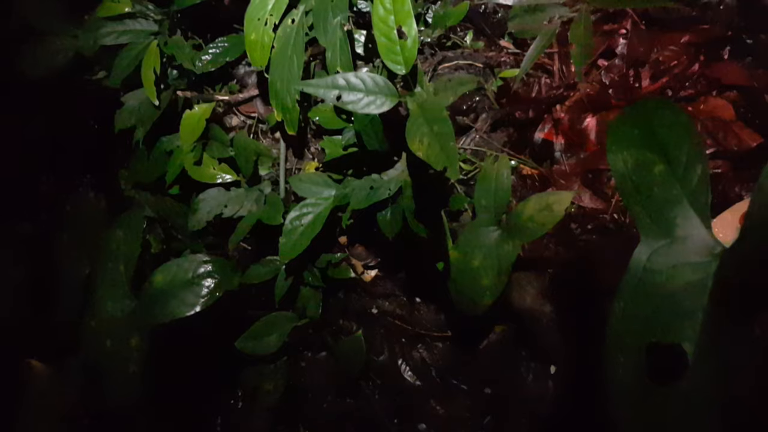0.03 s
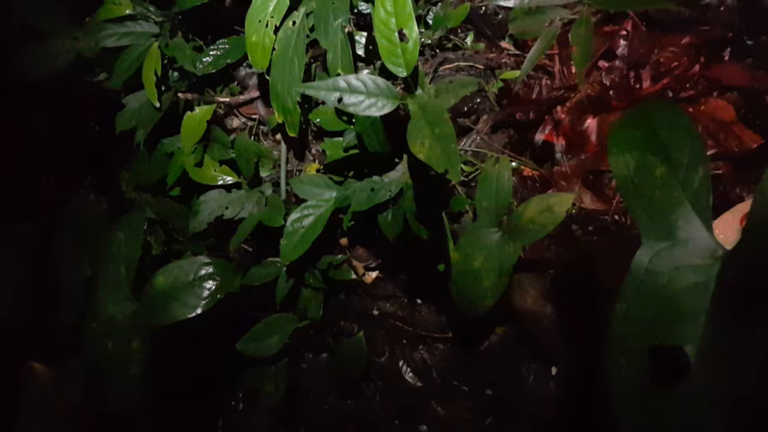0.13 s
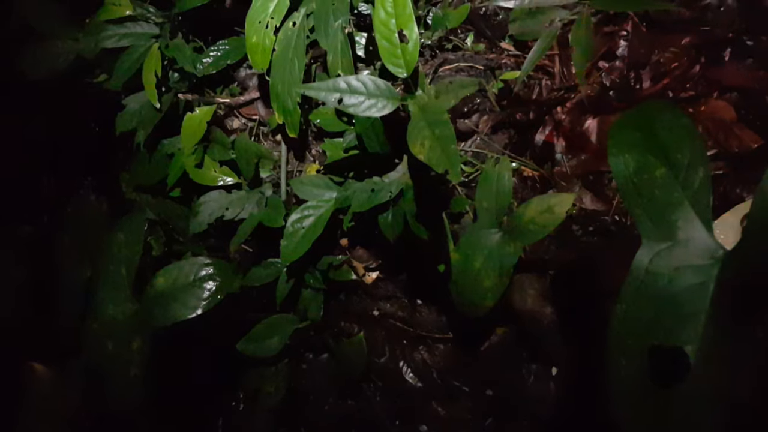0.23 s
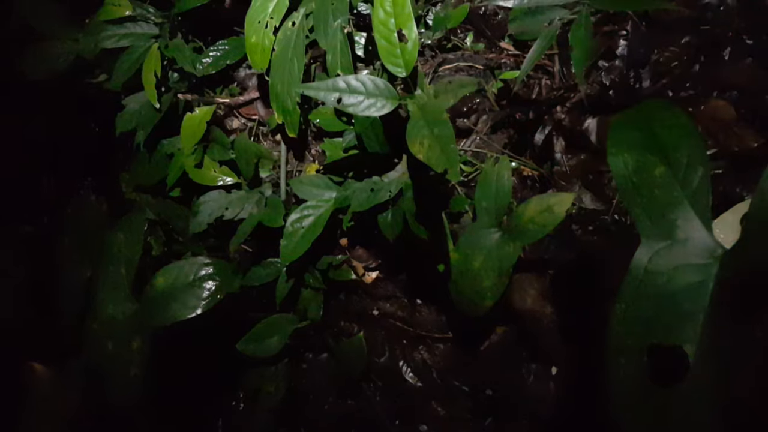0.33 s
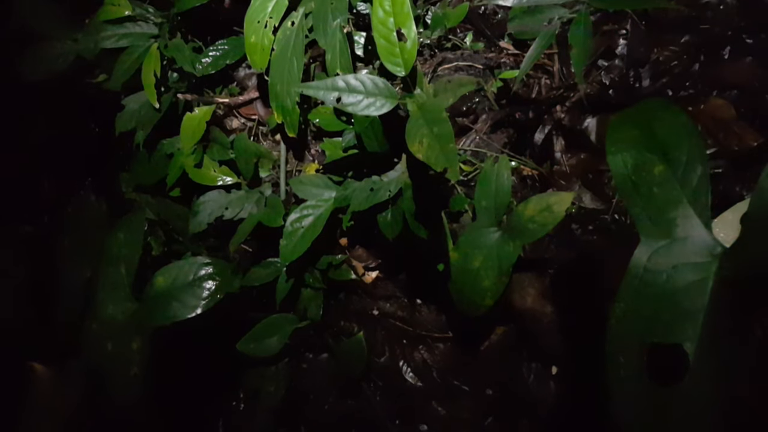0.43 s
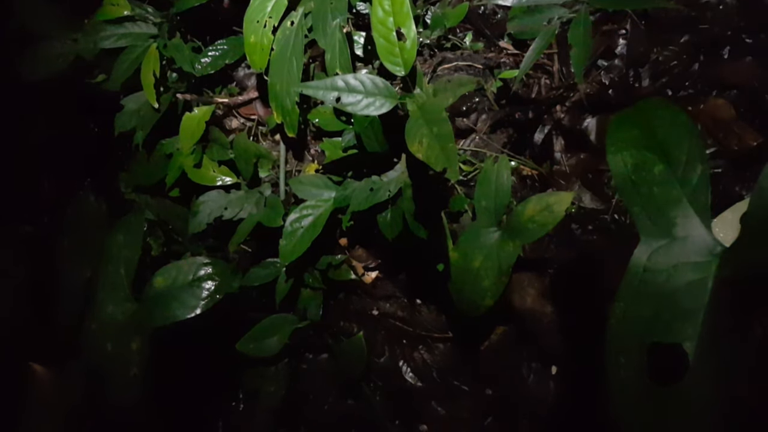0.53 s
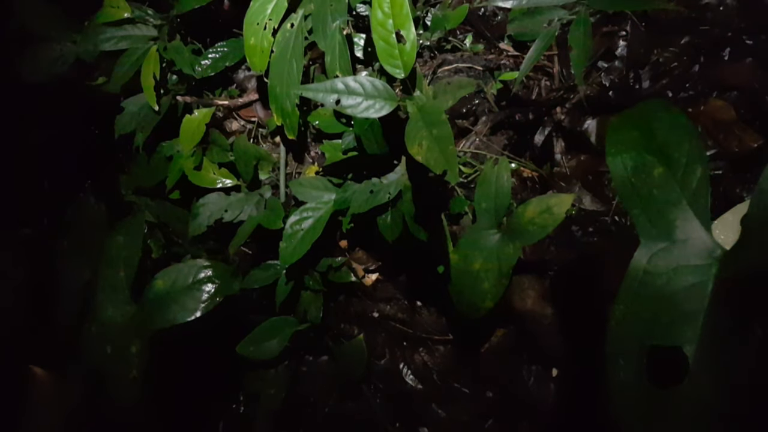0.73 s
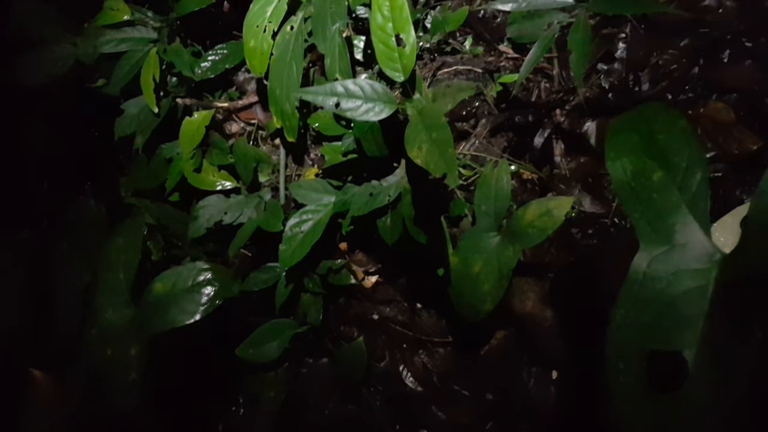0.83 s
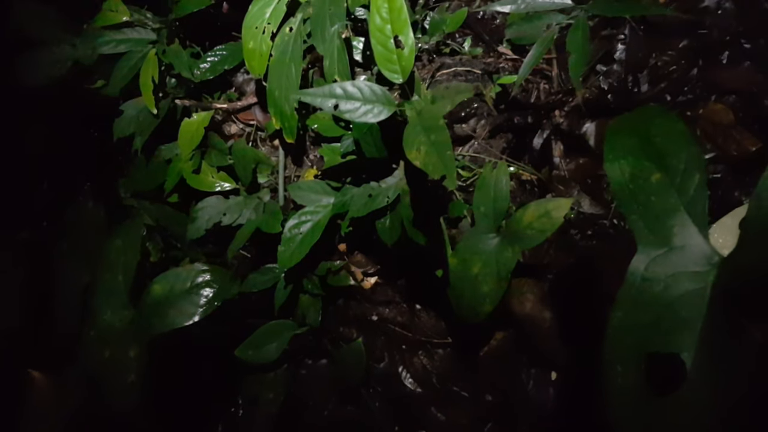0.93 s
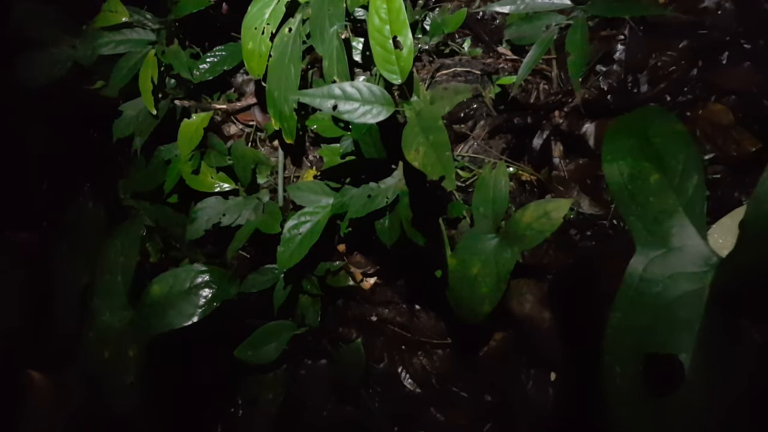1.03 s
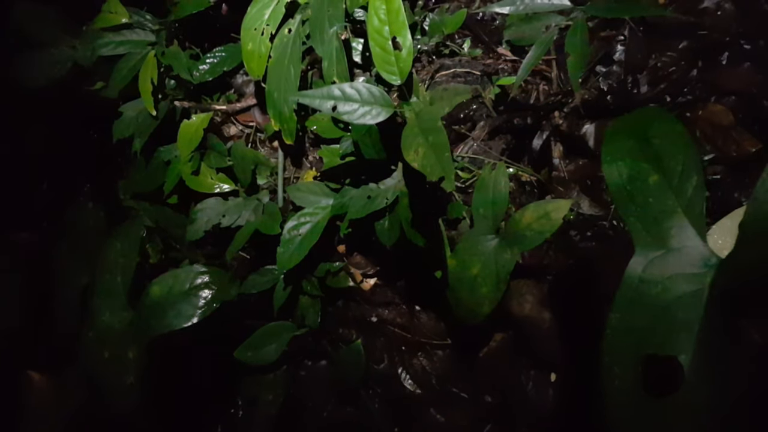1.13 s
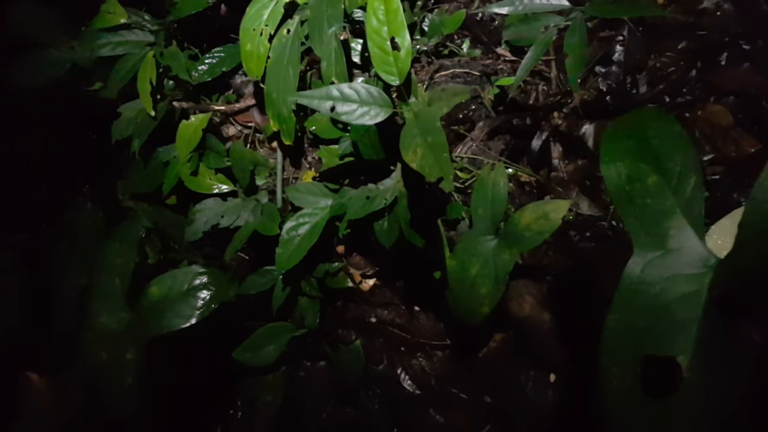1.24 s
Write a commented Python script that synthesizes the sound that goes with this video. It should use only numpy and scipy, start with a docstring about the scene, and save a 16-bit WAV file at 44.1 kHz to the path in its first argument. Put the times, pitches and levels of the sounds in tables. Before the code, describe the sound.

Loud, evenly spaced tree frog yelps rise and snap downward near a stereo microphone, brighter on the left, followed by one weak blurred call; high insect trill and faint low rumble continue underneath outdoors.

```python
"""A rainforest at night: a tree frog calls three times close by, and a fainter call follows from farther off.
Each call is a stack of harmonics that slides up, swells on the second one, then drops and breaks up.
Noise that dies away stands in for the leaves and trees, which ring on after each call.
Crickets and other insects, made of narrow bands of noise, drone steadily over a faint low rumble."""
import sys
import numpy as np
from scipy import signal
from scipy.fft import rfft, irfft
from scipy.io import wavfile
from scipy.ndimage import uniform_filter1d, minimum_filter1d

SR = 44100
rng = np.random.default_rng(int(sys.argv[2]) if len(sys.argv) > 2 else 0)


def log_audio(samples):
    """Write samples as a 16-bit WAV file to the path given in sys.argv[1]."""
    # one column per channel
    frames = np.atleast_2d(samples).T
    # limit to full scale, then quantise
    limited = np.clip(frames, -1, 1)
    pcm = np.round(limited * 32767).astype(np.int16)
    wavfile.write(sys.argv[1], SR, pcm)


N = 57330
HZ = np.fft.rfftfreq(N, 1 / SR)
TIME = np.arange(N) / SR


def amp(db):
    """Turns decibels into a gain."""
    return 10 ** (np.asarray(db) / 20)


def unit(x):
    """Scales a sound to an average (rms) level of 1."""
    return x / np.sqrt(np.mean(x ** 2) + 1e-20)


def read(points, hz):
    """Reads a table between its points, along a log-frequency axis."""
    point_hz, value = np.transpose(points)
    return np.interp(np.log(abs(hz) + 1), np.log(point_hz + 1), value)


def add(mix, start_s, sound):
    """Mixes a sound in at a time; whatever falls before time zero is left out."""
    at = round(start_s * SR)
    part = mix[:, max(at, 0):max(at + sound.shape[1], 0)]
    part += sound[:, max(-at, 0):][:, :part.shape[1]]


def noise(gain):
    """Random noise of rms 1, shaped by a gain for each frequency."""
    return unit(irfft(rfft(rng.standard_normal(N)) * gain, N))


# colour of the night air and distant chorus: (frequency [Hz], relative level per Hz [dB])
AIR_COLOUR = [(20, -15.5), (50, -3), (75, 4), (110, -3), (220, -15), (400, -16.5), (700, -2), (1400, -14),
              (2200, -5), (3300, -31), (3900, -12.5), (4500, 5), (5100, -6), (5850, 1.5), (6200, -7.5),
              (6700, -5), (7600, -6.5), (8600, 3), (9200, -7.5), (10500, -9.5), (13000, -14), (15700, -22)]
# how alike left and right are: (frequency [Hz], likeness [0-1])
AIR_LIKENESS = [(60, 0.43), (200, 0.47), (1000, 0.12), (5000, 0.092)]
AIR_DB = -55


def air():
    """Low rumble and the blurred hiss of far insects: coloured noise, partly shared by the two sides."""
    colour = amp(read(AIR_COLOUR, HZ))
    same = np.clip(read(AIR_LIKENESS, HZ), -1, 1)
    left, other = rfft(rng.standard_normal((2, N)))
    right = same * left + np.sqrt(1 - same ** 2) * other
    return amp(AIR_DB) * unit(irfft(colour * np.array([left, right]), N))


WING_HZ, WING_DEPTH = 182, .35  # wing strokes per second, and how deeply they pulse the sound


def insect(hz, width_hz, db, left_db):
    """A narrow wing resonance, pulsed by the wing strokes and scattered differently to each side."""
    resonance = 1 / (1 + ((HZ - hz) / (width_hz / 2)) ** 4) ** .5
    strokes = [1 + WING_DEPTH * np.cos(2 * np.pi * (WING_HZ * TIME + rng.random())) for _ in range(2)]
    sides = np.array([unit(noise(resonance) * stroke) for stroke in strokes])
    return sides * amp([[db + left_db / 2], [db - left_db / 2]])


# steady insects: (pitch [Hz], width [Hz], level [dB], left over right [dB])
STEADY_INSECTS = [(4373, 130, -57, 4.5), (4500, 37, -49, 7), (4664, 77, -54, 14.5),
                  (4717, 7.3, -52.5, -12.5), (4910, 26, -61, 9.5), (5290, 100, -66, -12),
                  (6650, 50, -64, 10), (7224, 240, -56.5, 7)]
# bouts of the lower buzz: (start [s], length [s], level [dB])
LOW_BOUTS = [(0.272, 0.673, -57)]
# bouts of the higher buzz: (start [s], length [s], level [dB])
HIGH_BOUTS = [(0.023, 0.14, -63), (0.711, 0.17, -64), (1.062, 0.185, -66)]
LOW_BUZZ_HZ, HIGH_BUZZ_HZ, BUZZ_WIDTH_HZ = 8060, 8870, 200
BOUT_LEFT_DB, BOUT_FADE_S = 16.5, .04  # left over right; fade at each end


def insects():
    """The steady drone of wings, and higher buzzes that come and go on the left."""
    out = sum(insect(*row) for row in STEADY_INSECTS)
    for hz, bouts in (LOW_BUZZ_HZ, LOW_BOUTS), (HIGH_BUZZ_HZ, HIGH_BOUTS):
        for start_s, length_s, db in bouts:
            to_nearest_end = np.minimum(TIME - start_s, start_s + length_s - TIME)
            gate = np.clip(to_nearest_end / BOUT_FADE_S, 0, 1)
            out = out + insect(hz, BUZZ_WIDTH_HZ, db, BOUT_LEFT_DB) * gate
    return out


# colour of the scatter off nearby leaves: (frequency [Hz], relative level [dB])
LEAVES_COLOUR = [(400, 15), (700, -0.5), (1300, -6), (2000, -10.5), (3000, -5), (5000, 7.5), (12000, -9)]
# decay among the trees: (frequency [Hz], time to fall by 60 dB [s])
FOREST_DECAY = [(400, .4), (1400, 1), (2200, 0.86), (5000, .3), (12000, 0.14)]
# colour of that decay: (frequency [Hz], relative level [dB])
FOREST_COLOUR = [(400, 13), (700, -3.5), (1100, -10), (1450, -2.5), (2200, 4), (4500, 19), (12000, 7.5)]
LEAVES_DB, LEAVES_DECAY_S = -18, .0053
ECHO_DB, ECHO_S, ECHO_SPREAD_S = -26.5, .039, .036
FOREST_DB = -31


def forest():
    """Quick scatter off nearby leaves, one cluster of echoes from the trunks, and a thin long tail."""
    leaves = np.array([noise(amp(read(LEAVES_COLOUR, HZ))) for _ in range(2)])
    leaves = leaves * np.exp(-TIME / LEAVES_DECAY_S)
    echo = rng.standard_normal((2, N)) * np.exp(-((TIME - ECHO_S) / ECHO_SPREAD_S) ** 2)
    # for the tail, each frequency of a noise dies away at its own rate
    hz, t, bands = signal.stft(rng.standard_normal((2, N)), SR, nperseg=256)
    fall_db = 60 * t / read(FOREST_DECAY, hz)[:, None]
    bands = bands * amp(read(FOREST_COLOUR, hz)[:, None] - fall_db)
    tail = signal.istft(bands, SR, nperseg=256)[1][:, :N] / np.sqrt(SR * .06)
    early = amp(ECHO_DB) * unit(echo) + amp(LEAVES_DB) * unit(leaves)
    return amp(FOREST_DB) * tail + early / np.sqrt(N)


SQUEAK_HZ, SQUEAK_WIDTH_HZ, SQUEAK_DB = 12150, 450, -57
SQUEAK_AT_S, SQUEAK_S = .072, .014  # peak time within the call, and spread around it


def squeak(t):
    """A faint high whistle as the sac swells: a narrow band of noise in a short bump."""
    whistle = noise(1 / (1 + (2 * (HZ - SQUEAK_HZ) / SQUEAK_WIDTH_HZ) ** 2))[:len(t)]
    return amp(SQUEAK_DB) * whistle * np.exp(-((t - SQUEAK_AT_S) / SQUEAK_S) ** 2)


FLUTTER_HZ = 240  # top speed of the wobble


def flutter(length):
    """A slow random wobble, made of noise with the fast part taken out."""
    return noise(1 / (1 + (HZ / FLUTTER_HZ) ** 4))[:length]


# slide shared by all calls, before each call's own stretch and pitch ratio: (time [s], pitch [Hz])
SLIDE = [(0, 360), (.02, 436), (.046, 536), (.061, 620), (.076, 664), (.108, 719), (.124, 738), (.132, 738),
         (.138, 700), (.15, 555), (.164, 495)]
# swell shared by all calls, stretched like the slide:
# (time [s], level [dB], vocal sac's lift of the 2nd harmonic [dB], roughness [0-1])
SWELL = [(0, -28, 4, .1), (.011, -10, 1, .1), (.02, -1, 0, .12), (.03, -2, 4.5, .12), (.041, 0, 9.5, .14),
         (.053, 0, 14.5, .3), (.062, 0, 20.5, .3), (.071, 0, 22, .07), (.086, 1, 21.5, .03),
         (.108, 0, 19, .02), (.122, .5, 19.5, .02), (.133, -1, 16, .04), (.141, -2, 6, .3),
         (.15, -9, 4, .4), (.164, -34, 2, .3)]
# strength of the harmonics at the vocal folds, first to last: level [dB]
HARMONICS_DB = [-26.5, -28, -31, -37, -51, -54, -66, -70]
# resonances of the throat, strongest on the sixth harmonic at the top of the slide:
# (frequency [Hz], level [dB])
THROAT = [(370, -9.5), (490, -5), (1500, 2), (2050, 3.5), (2200, -0.5), (2500, -10.5), (2900, -4),
          (3200, -17.5), (3650, 3.5), (4000, 7), (4380, 24.5), (4700, 4), (5150, 21), (5900, -14)]
# the right side lies in the shade of the leaves: (frequency [Hz], level against the left [dB])
SHADE = [(400, 0), (750, -3), (1050, -6), (1300, -5.5), (1375, -6.5), (1425, -10), (1470, -9.5), (1700, -4),
         (2100, -11), (4000, -11.5), (4250, -7), (4450, -12)]
# breathy noise in the rough parts of a call: (frequency [Hz], relative level per Hz [dB])
RASP_COLOUR = [(100, -18), (300, -25.5), (900, -8), (2500, 9), (3200, -7.5), (4300, 3), (5300, -6),
               (6200, -25), (12000, -22.5), (16000, -26)]
RASP_DB = -23.5
RIGHT_LAG_S = .00001
JITTER, SHIMMER = .04, .38  # shares of pitch and of size that wobble where the call is rough
UPPER_RISE_S, UPPER_START_DB = .069, -14.5  # for the fourth harmonic and up
LOW_CUT_HZ = 410


def call(length_s, ratio, fade_s, sac_share):
    """Harmonics of the vocal folds pass the throat and sac; they flutter as the call starts and collapses."""
    t = np.arange(0, length_s, 1 / SR)
    table_time = t / length_s * SLIDE[-1][0]  # stretches the tables to the length of this call

    def follow(when, value):
        """Reads a table along the call and rounds its corners."""
        return uniform_filter1d(np.interp(table_time, when, value), size=180)

    when, *columns = np.transpose(SWELL)
    level_db, sac_db, rough = (follow(when, column) for column in columns)
    hz = ratio * follow(*np.transpose(SLIDE))
    turns = np.cumsum(hz * (1 + JITTER * rough * flutter(len(t)))) / SR

    voice = np.zeros((2, len(t)))
    for k, fold_db in enumerate(HARMONICS_DB, 1):
        is_second = k == 2
        size = amp(fold_db + read(THROAT, k * hz) + sac_share * sac_db * is_second)
        # the second harmonic wobbles half as much
        size = size * (1 + SHIMMER * rough * flutter(len(t)) / (1 + is_second))
        if k > 3:  # the upper harmonics come in later
            size = size * amp(UPPER_START_DB * np.maximum(1 - t / UPPER_RISE_S, 0))
        voice[0] += size * np.cos(2 * np.pi * k * turns)
        right_turns = turns - hz * RIGHT_LAG_S
        voice[1] += size * amp(read(SHADE, k * hz)) * np.cos(2 * np.pi * k * right_turns)

    rasp = np.array([noise(amp(read(RASP_COLOUR, HZ)))[:len(t)] for _ in range(2)])
    rasp = rasp * rough * amp(RASP_DB) * (hz / hz.max()) ** 3  # stronger at high pitch
    fade_in = np.minimum(t / fade_s, 1) ** 2
    envelope = amp(level_db) * fade_in * signal.windows.tukey(len(t), .04)
    low_cut = signal.butter(2, LOW_CUT_HZ, "highpass", fs=SR, output="sos")
    return signal.sosfilt(low_cut, (np.sqrt(2) * voice + rasp + squeak(t)) * envelope)


# calls; the first ends before time zero, so only its ringing is left, and the last is the far one:
# (start [s], length [s], pitch ratio, fade-in [s], share of the sac's lift [0-1],
#  direct gain [dB], scattered gain [dB])
CALLS = [(-.175, .171, 1.02, .008, 1, 1, 3.5), (.159, .171, 1.012, .008, 1, 1, 1),
         (.499, .164, 1, .008, 1, 0, 0), (.849, .162, .992, .008, 1, -.5, -.5),
         (1.177, .125, .968, .055, .7, -29, -9)]


def frogs():
    """Each call arrives directly and by way of the leaves and trees."""
    out = np.zeros((2, N))
    for start_s, length_s, ratio, fade_s, sac_share, direct_db, scattered_db in CALLS:
        voice = call(length_s, ratio, fade_s, sac_share)
        scattered = signal.fftconvolve(voice[:1], forest(), axes=1)
        add(out, start_s, voice * amp(direct_db))
        add(out, start_s, scattered * amp(scattered_db))
    return out


def scene():
    """Frogs, insects and night air together."""
    return frogs() + insects() + air()


START_S, EDGE_HZ = .068, 15750  # end of the opening silence; top of the band
CEILING, LIMITER_S = .97, .008  # limiter's peak level and smoothing time


def record(dry):
    """The sound opens after a moment of silence; a limiter holds the loudest peaks; then the top is cut."""
    opened = dry * np.clip((TIME - START_S) / .003, 0, 1)
    room = CEILING / np.maximum(abs(opened).max(0), CEILING)
    span = round(LIMITER_S * SR)
    limited = opened * uniform_filter1d(minimum_filter1d(room, span), span)
    top_cut = signal.firwin(511, EDGE_HZ, window=("kaiser", 9), fs=SR)
    return signal.oaconvolve(limited, top_cut[None], "same")


dry = scene()
out = record(dry)
log_audio(out)
```